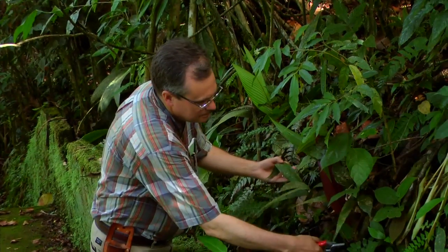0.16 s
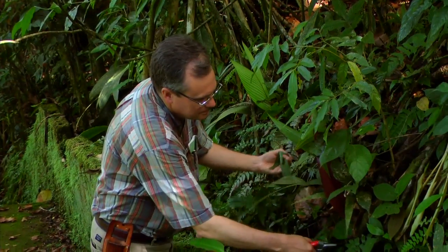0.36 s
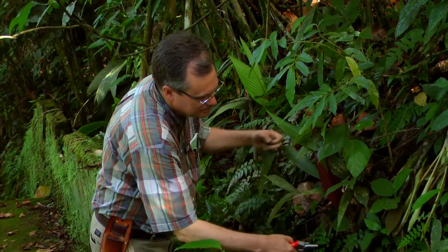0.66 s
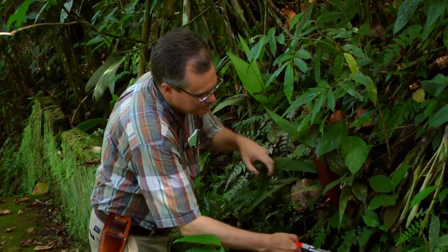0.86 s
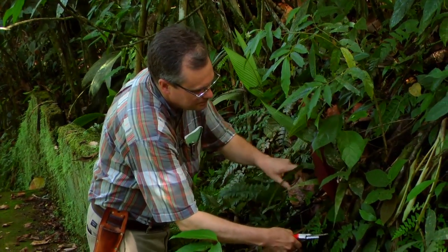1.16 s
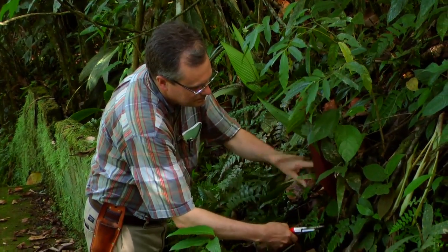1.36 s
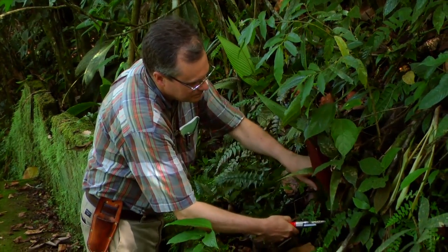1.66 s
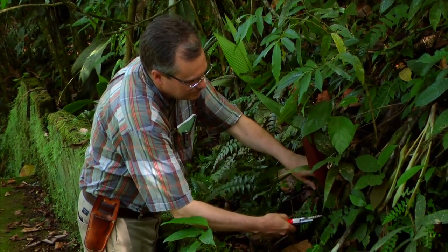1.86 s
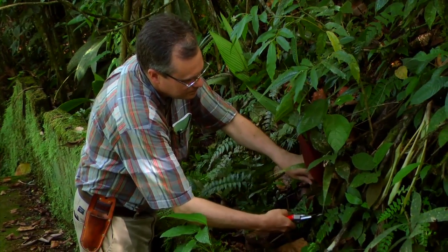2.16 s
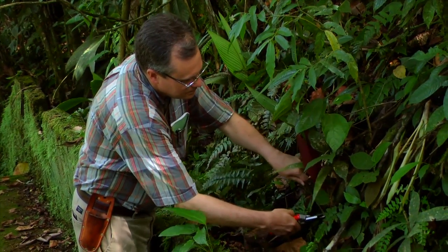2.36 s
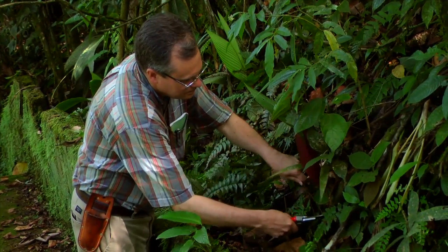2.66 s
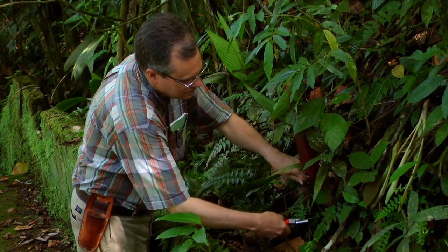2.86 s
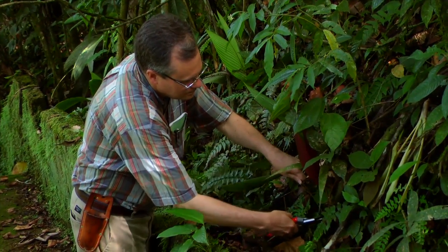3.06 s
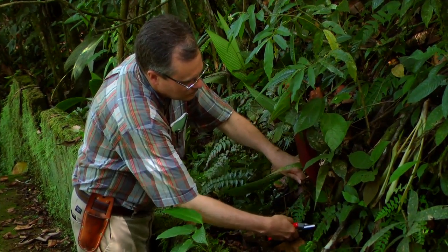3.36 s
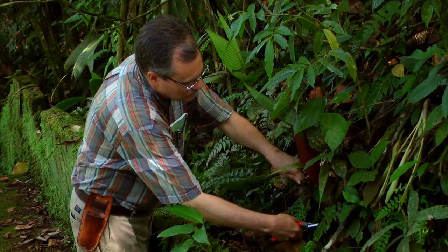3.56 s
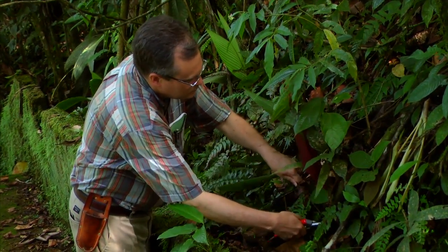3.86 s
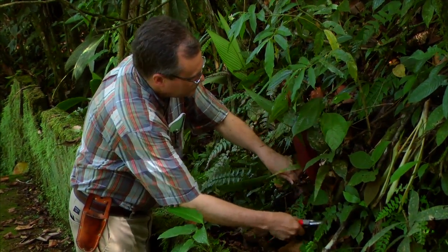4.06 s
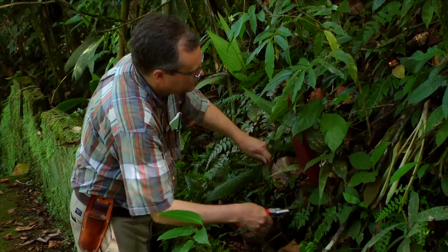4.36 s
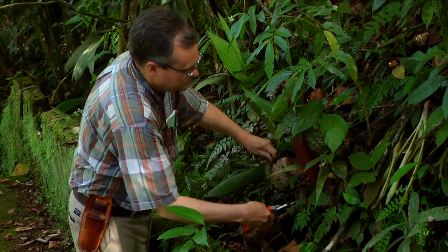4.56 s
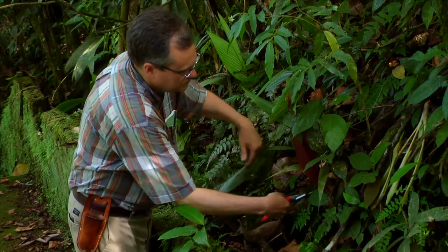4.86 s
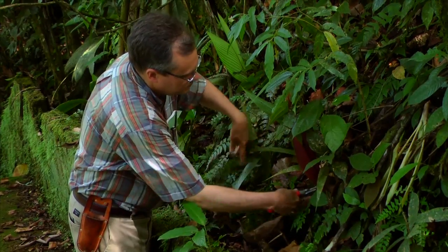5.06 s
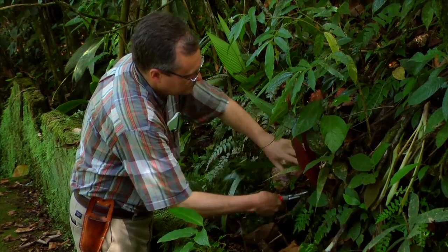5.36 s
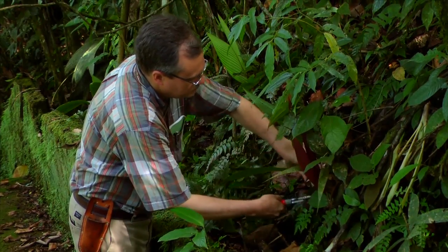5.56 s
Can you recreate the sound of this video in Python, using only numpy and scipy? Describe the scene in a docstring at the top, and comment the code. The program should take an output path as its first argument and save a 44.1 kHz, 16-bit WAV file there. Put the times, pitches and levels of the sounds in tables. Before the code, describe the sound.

Close by, leaves rustle and hand pruners snap a stem almost at once, then two more later, each a sharp crack with tiny fibre cracks. Between cuts, foliage brushes, flicks and lightly clicks. Behind, a continuous high insect shrill with pulsed trills, buzzing swells and thin falling bird notes, over soft air rumble. Open rainforest, close microphone, same sound in both channels.

```python
"""Insects shrill over moving air, rumble and a low hum (coloured noise, wavering sines) in a rainforest; leaves rustle.
Hand pruners soon cut the first of three stems: two fibres crack, the stem snaps, the blades close with a weaker knock.
Leaves rub in tiny ringing slips; flicks, knocks and cracks are coloured noise bursts; pruner clicks ring steel modes.
Behind, insects trill (pulsed noise) and buzz in swells that sink in pitch (lines and hiss); a bird calls in falling
sines."""
import sys
import numpy as np
from scipy import signal
from scipy.fft import rfft, irfft
from scipy.io import wavfile

SR = 44100
rng = np.random.default_rng(int(sys.argv[2]) if len(sys.argv) > 2 else 0)


def unload_wav(signal):
    """Save mono or channel-first audio to the path in sys.argv[1] as 16-bit WAV at rate SR, clipped to [-1, 1]."""
    wavfile.write(
        sys.argv[1],
        SR,
        np.round(np.clip(np.atleast_2d(signal).T, -1, 1) * 32767).astype(np.int16),
    )


N = 252252


def from_db(db):
    """Decibels to gain."""
    return np.exp(np.asarray(db) * (np.log(10) / 20))


def rms_one(x):
    """Scale to an rms of 1."""
    return x / np.sqrt(np.mean(x ** 2) + 1e-20)


def at_hz(points, hz):
    """Read a table on a log-frequency axis."""
    table_hz, values = np.array(points).T
    return np.interp(np.log(hz), np.log(table_hz), values)


def add(track, start_s, sound):
    """Mix a sound in at a time."""
    at = int(np.clip(round(start_s * SR), 0, N - 1))
    track[at:at + len(sound)] += sound[:N - at]


def drift(rate_hz, size=N):
    """Slow chance with a spread of 1: low-passed noise drawn every 40 samples."""
    pole = np.exp(-2 * np.pi * rate_hz * 40 / SR)
    white = rng.standard_normal(size // 40 + 2002)
    slow = signal.lfilter([1], [1, -2 * pole, pole ** 2], white)[2000:]  # skip the filter's start
    return np.interp(np.arange(size) / 40, np.arange(len(slow)), rms_one(slow))


def ring(clicks, hz, t60_s):
    """A resonance: a unit click sets a decaying sine of height 1 ringing."""
    pole, w = np.exp(-np.log(1000) / (t60_s * SR)), 2 * np.pi * hz / SR
    return signal.lfilter([0, np.sin(w)], [1, -2 * pole * np.cos(w), pole ** 2], clicks + 1e-18)


def hiss(spectrum):
    """Steady noise of a given colour, rms 1."""
    hz = np.maximum(np.fft.rfftfreq(N, 1 / SR), 1)
    return rms_one(irfft(rfft(rng.standard_normal(N)) * from_db(at_hz(spectrum, hz)), N))


def coloured(x, db_at):
    """Causal (minimum-phase) filter with a given response in dB, built by folding the cepstrum."""
    size = 2 * len(x)
    hz = np.maximum(np.fft.rfftfreq(size, 1 / SR), 1)
    cepstrum = irfft(np.log(from_db(db_at(hz))))
    cepstrum[1:len(x)] *= 2
    cepstrum[len(x) + 1:] = 0
    return irfft(rfft(x, size) * np.exp(rfft(cepstrum)))[:len(x)]


BAND_EDGES_HZ = 100 * 2 ** np.arange(0, 8, .5)


def shower(t60_at, size):
    """White noise of unit energy that dies away at its own pace in each half-octave band."""
    t, out = np.arange(size) / SR, 0
    hz, white = np.fft.rfftfreq(size, 1 / SR), rfft(rng.standard_normal(size))
    for low, high in zip(BAND_EDGES_HZ, BAND_EDGES_HZ[1:]):
        band = irfft(white * (hz >= low) * (hz < high), size)
        dying = band * np.exp(-np.log(1000) * t / t60_at(np.sqrt(low * high)))
        out = out + rms_one(dying) * np.sqrt(high - low)
    return out / np.linalg.norm(out)


def energy_over_10_ms(x, db):
    """Scale a burst to the energy of 10 ms at a given rms level."""
    return from_db(db) * x / np.linalg.norm(x) * np.sqrt(SR / 100)


def cracks(rows, colour, focus_db, ring_db, splinter_db, low_linger, lag_s=0.000982):
    """Each crack is one sharp release and a dying shower of tiny ones; the size of the part sets its ringing pitch."""
    out, grid_hz = np.zeros(N), np.fft.rfftfreq(4096, 1 / SR)
    # bending waves: lows arrive late, by lag_s at 4 kHz
    release = irfft(np.exp(-4j * np.pi * lag_s * np.sqrt(4000 * grid_hz)))
    for start_s, db, centre_hz, t60_s in rows:
        def splinter_t60(hz):
            return t60_s * (centre_hz / hz) ** low_linger

        def response_db(hz):
            octaves = np.log2(hz / centre_hz)
            peak_db = ring_db / (1 + (octaves / 0.21) ** 2)
            return at_hz(colour, hz) - focus_db * np.hypot(octaves, .5) + peak_db

        force = release + from_db(splinter_db) * shower(splinter_t60, size=len(release))
        add(out, start_s, energy_over_10_ms(coloured(force, response_db), db))
    return out


# Shrill insect chorus. Each row: frequency in Hz, relative level in dB per Hz.
CHORUS_SPECTRUM = [(6000, -34.5), (6800, -10), (7500, -0.5), (8400, 1.5), (9500, 3.5), (10200, 3),
                   (11000, -3.5), (12200, -11.5), (14000, -20), (16000, -17)]
# Moving air and low rumble. Each row: frequency in Hz, relative level in dB per Hz.
AIR_SPECTRUM = [(14, 2.5), (22, 2.5), (35, -9), (50, -27.5), (80, -21), (115, -20.5), (160, -21),
                (260, -25.5), (500, -29), (1000, -34), (2400, -35), (3400, -37.5), (5200, -37), (7000, -42),
                (16000, -58)]
# Hum lines. Each row: frequency in Hz, level in dB at the mean background level.
HUM_LINES = [(118.5, -62), (235, -67.5)]


def background(forest_db):
    """Insect chorus and moving air are coloured noise, the hum wavering sines; all follow one level."""
    chorus = from_db(forest_db - 1.2 + 0.18 * drift(35)) * hiss(CHORUS_SPECTRUM)
    air = from_db(forest_db + 4.0) * hiss(AIR_SPECTRUM)
    hum = 0
    for hz, db in HUM_LINES:
        level = from_db(db + 2.0 * drift(1.07))
        phase = 2 * np.pi * np.cumsum(hz * (1 + 0.0206 * drift(4.12))) / SR
        hum = hum + level * np.sqrt(2) * np.sin(phase)
    return chorus + air + hum * from_db(forest_db - forest_db.mean())


# Bush cricket's bouts. Each row: start in seconds, end in seconds, level at the stroke peaks in dB.
TRILL_BOUTS = [(.55, 1.45, -64), (1.8, 2.95, -63), (3.33, 4.25, -60), (4.854, 5.72, -56)]
# Trill colour. Each row: frequency in Hz, relative level in dB per Hz.
TRILL_SPECTRUM = [(11000, -44), (13200, -14), (14500, 6), (15500, 4), (16000, -2), (17000, -40)]


def trill(strokes_per_s=29.8, fade_s=.04):
    """Each wing stroke draws the scraper over the file: a short, very high rasp."""
    t, bouts = np.arange(N) / SR, 0
    for start_s, end_s, db in TRILL_BOUTS:
        bouts = bouts + from_db(db) * np.clip(np.minimum(t - start_s, end_s - t) / fade_s, 0, 1)
    strokes = np.sin(np.pi * strokes_per_s * t) ** 8
    return bouts * strokes * hiss(TRILL_SPECTRUM)


# Far buzzing swells. Each row: start in seconds, hold in seconds, final pulses per second,
# level in dB before the line, whine and hiss gains.
BUZZ_SWELLS = [(.52, .65, 244, -58), (2.15, .35, 253.5, -59), (2.45, .25, 257, -60.5),
               (4.15, .45, 244, -55.5)]
# Buzz colour. Each row: frequency in Hz, relative level in dB (per Hz for the hiss).
BUZZ_SPECTRUM = [(2300, -26), (3100, 1), (3450, 1.5), (3900, -1), (4600, 3), (5500, -1.5), (6300, -3),
                 (7200, -19)]
SWELL_ATTACK_S, SWELL_FADE_DB_PER_S = 0.35, 18
START_EXCESS, SETTLE_S = .07, .42  # share by which each starts too fast, and its settling time
LINES_GAIN_DB, WHINE_GAIN_DB, BUZZ_HISS_GAIN_DB = -1.5, -9.5, 1.5


def buzz():
    """Far insects' clicking drums swell and slow, two of them overlapping in the middle.

    Each is a stack of sinking lines, one a whine, partly blurred to hiss by the forest."""
    tones, power, age_s = np.zeros(N), np.zeros(N), np.arange(2 * SR) / SR
    haste, n = np.exp(-age_s / SETTLE_S), len(age_s)
    for start_s, hold_s, rate, db in BUZZ_SWELLS:
        fade_db = SWELL_FADE_DB_PER_S * np.maximum(age_s - SWELL_ATTACK_S - hold_s, 0)
        swell = np.sqrt(np.minimum(age_s / SWELL_ATTACK_S, 1)) * from_db(db - fade_db)
        pulse_rate = rate * (1 + START_EXCESS * haste + .002 * drift(20, size=n))
        phase = 2 * np.pi * np.cumsum(pulse_rate) / SR
        lines = 0
        for k in range(12, 25):
            line = drift(8, size=n) * np.cos(k * phase + rng.uniform(0, 2 * np.pi))
            lines = lines + line * from_db(at_hz(BUZZ_SPECTRUM, k * rate))
        whine_shape = 5 * np.sqrt(haste) * (1 - haste)
        whine = whine_shape * from_db(4 * drift(14, size=n)) * np.sin(13 * phase)
        add(tones, start_s, swell * (from_db(LINES_GAIN_DB) * rms_one(lines) + from_db(WHINE_GAIN_DB) * whine))
        add(power, start_s, swell ** 2)
    return tones + from_db(BUZZ_HISS_GAIN_DB) * np.sqrt(power) * hiss(BUZZ_SPECTRUM)


def trees(x, t60_s=0.24):
    """Trunks return a long, diffuse echo of a far caller: decaying noise as impulse response."""
    t = np.arange(SR // 2) / SR
    tail = rng.standard_normal(len(t)) * np.exp(-np.log(1000) * t / t60_s)
    return signal.fftconvolve(x, tail / np.linalg.norm(tail))[:N]


def falling_note(length_s, hz, db, fall=.022, waver=.006):
    """A near sine that swells, sinks a little in pitch and fades."""
    u = np.linspace(0, 1, int(length_s * SR))
    pitch_hz = hz * (1 - fall * u + waver * drift(80, size=len(u)))
    swell = np.sqrt(2 * np.abs(np.sin(np.pi * u)))
    return from_db(db) * swell * np.sin(2 * np.pi * np.cumsum(pitch_hz) / SR)


# Bird calls. Each row: start in seconds, starting pitch in Hz, direct level at mid-note in dB.
CALLS = [(2.408, 6930, -49), (3.519, 6960, -44), (4.476, 6940, -44), (5.400, 6940, -44)]
NOTE_LENGTHS_S, NOTE_SPACING_S = (0.014, 0.063), 0.037


def bird():
    """Every call is a pair of thin falling notes, short then longer, echoed by the trees."""
    song = np.zeros(N)
    for start_s, hz, db in CALLS:
        for k, length_s in enumerate(NOTE_LENGTHS_S):
            add(song, start_s + k * NOTE_SPACING_S, falling_note(length_s, hz, db))
    return song + from_db(1) * trees(song)


# Hand stirring the foliage. Each row: time in seconds, middle-band level in dB, still forest included.
STIR_LEVEL = [(0.0, -63.5), (0.11, -62), (0.46, -55.5), (0.94, -56), (1.02, -58), (1.78, -58.5), (2.1, -65),
              (2.36, -62.5), (2.69, -60), (3.01, -61.5), (3.78, -60), (4.16, -50.5), (4.33, -53),
              (4.52, -56.5), (4.75, -57), (5.03, -54.5), (5.24, -49.5), (5.72, -51)]
STIR_GAIN_DB = 0.3
STILL_BAND_DB = -13.5  # the still forest's share of that band, relative to the background level


def stirring(forest_db):
    """The rustle is what the middle band holds above the still forest."""
    time_s, level_db = np.transpose(STIR_LEVEL)
    band_db = np.interp(np.arange(N) / SR, time_s, level_db)
    still_share = from_db(forest_db + STILL_BAND_DB - band_db) ** 2
    return STIR_GAIN_DB + band_db + 10 * np.log10(np.maximum(1 - still_share, .04))


# Leaves brushing past hand and sleeve. Each row: middle in seconds, length in seconds,
# rubbing level in dB before the grain and hiss gains, crisp edge level in dB.
LEAF_BRUSHES = [(0.112, 0.046, -55, -76), (0.293, 0.07, -56, -64), (0.675, 0.21, -52.5, -52),
                (0.992, 0.051, -46, -47), (1.127, 0.02, -48, -71), (1.266, .03, -52, -76),
                (1.385, 0.1, -49, -68), (1.714, 0.061, -51.5, -56), (1.822, 0.04, -53, -70),
                (1.918, 0.033, -44.5, -64), (2.473, 0.026, -54, -74), (3.729, 0.034, -49, -69),
                (3.888, 0.052, -52.5, -66), (4.035, 0.092, -47, -60), (4.388, 0.12, -47, -44),
                (4.44, 0.04, -47.5, -43.5), (5.13, 0.18, -48, -47.5), (5.209, 0.028, -46.5, -58)]
# Rubbing leaves. Each row: frequency in Hz, relative level in dB per Hz.
LEAF_SPECTRUM = [(200, -15), (500, -9.5), (1200, -7), (2500, -3), (4000, -6.5), (6500, -9), (10000, -24.5),
                 (16000, -37)]
# Crisp leaf edges. Each row: frequency in Hz, relative level in dB per Hz.
EDGE_SPECTRUM = [(3000, -17), (6000, -1), (13000, -5), (16000, -14)]


def rustle(stir_db, slips_per_s=1400, clump_db=5.5):
    """Leaves rub in clumps of tiny slips, each ringing for a few cycles; the colour shifts from leaf to leaf."""
    power, edge_power, t = from_db(stir_db) ** 2, 0, np.arange(N) / SR
    for middle_s, length_s, db, edge_db in LEAF_BRUSHES:
        swell = np.exp(-(2 * (t - middle_s) / length_s) ** 2)
        power = power + from_db(db) ** 2 * swell
        edge_power = edge_power + from_db(edge_db) ** 2 * swell
    slip_chance = slips_per_s * from_db(clump_db * drift(70)) / SR
    slips = rng.choice([-1, 1], N) * (rng.random(N) < slip_chance)
    pitches_hz = np.geomspace(250, 14000, 24)
    dealt = rng.integers(0, len(pitches_hz), N)  # each slip gets one pitch
    grains = 0
    for k, hz in enumerate(pitches_hz):
        struck = slips * (dealt == k) * from_db(1.4 * drift(24.0))
        grains = grains + from_db(at_hz(LEAF_SPECTRUM, hz)) * np.sqrt(hz) * rms_one(ring(struck, hz, 14.6 / hz))
    rubbing = from_db(1.5) * rms_one(grains) + from_db(-5) * hiss(LEAF_SPECTRUM)
    edges = rms_one(hiss(EDGE_SPECTRUM) * from_db(5 * drift(200)))
    return np.sqrt(power) * rubbing + np.sqrt(edge_power) * edges


# Leaves and stalks flicking and knocking. Each row: start in seconds, energy as dB over 10 ms,
# ringing pitch in Hz, t60 in seconds.
SINGLE_FLICKS = [(.3685, -38.5, 1570, 0.059), (.412, -42.5, 1930, 0.015), (.444, -46, 2010, .015),
                 (.7114, -44.5, 4200, 0.014), (.8985, -46.5, 2000, 0.017), (.9563, -40, 2660, 0.066),
                 (1.045, -39.5, 3050, 0.37), (3.3529, -44, 2620, 0.091), (4.3077, -39.5, 1500, 0.018),
                 (4.4624, -38, 2350, .021), (4.856, -45.5, 2350, 0.033), (5.0795, -38, 3630, 0.017),
                 (5.2251, -36.5, 2780, 0.022), (5.5027, -28.5, 1080, 0.0055), (5.5035, -37, 470, 0.011),
                 (5.5122, -40.5, 4000, 0.1), (5.6142, -45.5, 2260, 0.035)]
# Flick colour. Each row: frequency in Hz, gain in dB.
FLICK_RESPONSE = [(60, -30), (300, 8.5), (1000, 4), (3000, -1.5), (6000, -2.5), (8000, -13), (16000, -30)]
RECOIL_DELAY_S, RECOIL_HZ, RECOIL_T60_S = .012, 1830, 0.056  # the freed stem springs away after the snap
SMALL_PER_S, SMALL_HZ, SMALL_T60_S = 6.5, 2040, 0.043
SMALL_OVER_STIR_DB = 5


def flicks(stir_db, spread_db=1.5, spread_octaves=0.25):
    """Leaves and stalks spring back: after each cut, in single knocks, and by chance, more and louder when stirred."""
    recoils = [(snap_s + RECOIL_DELAY_S, db, RECOIL_HZ, RECOIL_T60_S) for snap_s, *_, db in STEM_CUTS]
    effort = np.cumsum(from_db(stir_db))
    count = int(SMALL_PER_S * N / SR)
    shares = (np.arange(count) + rng.random(count)) / count
    small = []
    for at in np.searchsorted(effort, effort[-1] * shares):
        level_chance, pitch_chance = rng.standard_normal(2)
        db = stir_db[at] + SMALL_OVER_STIR_DB + spread_db * level_chance
        small.append((at / SR, db, SMALL_HZ * 2 ** (spread_octaves * pitch_chance), SMALL_T60_S))
    return cracks(SINGLE_FLICKS + recoils + small, FLICK_RESPONSE,
                  focus_db=7.0, ring_db=6.0, splinter_db=8.0, low_linger=0.088)


# Light pruner clicks. Each row: start in seconds, energy as dB over 10 ms, t60 in seconds,
# loss of modes away from the main one in dB per octave.
PRUNER_CLICKS = [(.7897, -40, 0.006, -5), (3.2371, -41, 0.0074, 0), (3.6043, -40.5, 0.016, 21)]
# Steel modes. Each row: frequency in Hz, relative level in dB.
STEEL_MODES = [(2400, -29.5), (2900, 7), (3660, -4), (4375, 16.5), (4980, 9), (5680, 3), (6250, 8),
               (8200, 12)]
MAIN_MODE_HZ = 4550


def clicks(spread_db=-5.0, scrape_db=5, scrape_t60_s=0.014):
    """The steel is tapped and scrapes briefly; each tap weights its modes differently."""
    out = np.zeros(N)
    for start_s, db, t60_s, loss_db in PRUNER_CLICKS:
        scrape = shower(lambda hz: scrape_t60_s, size=4096)
        force = signal.unit_impulse(4096) + from_db(scrape_db) * scrape
        ping = 0
        for hz, mode_db in STEEL_MODES:
            weight_db = mode_db - loss_db * abs(np.log2(hz / MAIN_MODE_HZ)) + spread_db * rng.standard_normal()
            ping = ping + from_db(weight_db) * ring(force, hz, t60_s)
        add(out, start_s, energy_over_10_ms(ping, db))
    return out


# Stems cut. Each row: snap in seconds, energy as dB over 10 ms, ringing pitch in Hz, splintering t60 in seconds,
# fibre spacing in seconds, fibre level in dB, fibre pitch in Hz, closing delay in seconds, closing level in dB,
# closing pitch in Hz, recoil level in dB. All but the recoil are then scaled by CUT_GAIN_DB.
STEM_CUTS = [(0.3359, -20.5, 1930, 0.0046, .0093, -31, 2900, 0.00061, -23, 2030, -35),
             (2.6877, -21, 3140, 0.023, 0.014, -34, 3520, 0.013, -48, 1400, -42),
             (4.0872, -23, 6250, 0.025, .0085, -30.5, 6100, 0.00034, -27, 850, -34.5)]
# Stem breaking in the blades. Each row: frequency in Hz, gain in dB.
CUT_RESPONSE = [(60, -6), (150, -2.5), (300, -5), (700, -5), (1300, 0), (2000, -3), (3000, -1), (3900, -4),
                (5500, 0.5), (7500, -8.5), (10000, -8), (12000, -12), (13300, -14), (16000, -19)]
CUT_GAIN_DB = -0.9
BITE_LEAD_S, BITE_DB, BITE_HZ, BITE_T60_S = 0.047, -41, 3700, 0.15  # level before CUT_GAIN_DB
FIBRE_STEP_DB, FIBRE_T60_S = 5.5, .017  # the earlier fibre is a step weaker
CLOSING_T60_S = 0.0073


def pruners():
    """The blade scrapes into the stem, two fibres crack in turn, the stem snaps and the blades close."""
    rows = []
    for snap_s, db, hz, t60_s, spacing_s, fibre_db, fibre_hz, delay_s, closing_db, closing_hz, _ in STEM_CUTS:
        rows.append((snap_s - BITE_LEAD_S, BITE_DB, BITE_HZ, BITE_T60_S))
        for k in range(2):
            rows.append((snap_s - (k + 1) * spacing_s, fibre_db - k * FIBRE_STEP_DB, fibre_hz, FIBRE_T60_S))
        rows.append((snap_s, db, hz, t60_s))
        rows.append((snap_s + delay_s, closing_db, closing_hz, CLOSING_T60_S))
    return from_db(CUT_GAIN_DB) * cracks(rows, CUT_RESPONSE,
                                         focus_db=3.0, ring_db=3.5, splinter_db=6.0, low_linger=0.33)


# Sound scattered back. Each row: frequency in Hz, relative level in dB per Hz.
SCATTER_SPECTRUM = [(100, -20), (280, 0.5), (700, -9), (1500, -8.5), (3000, -2), (6000, -2.5),
                    (15000, -4.5)]
# Its decay. Each row: frequency in Hz, t60 in seconds.
SCATTER_DECAY = [(150, 0.3), (1500, 0.08), (5000, 0.03), (15000, 0.039)]


def undergrowth(x):
    """Leaves and ground scatter a short tail in which the lows last longest."""
    tail = shower(lambda hz: at_hz(SCATTER_DECAY, hz), size=8192)
    tail = coloured(tail, lambda hz: at_hz(SCATTER_SPECTRUM, hz))
    tail *= 1 - np.exp(-np.arange(len(tail)) / SR / 0.0011)  # soft onset
    return signal.fftconvolve(x, tail / np.linalg.norm(tail))[:N]


FOREST_DB, FOREST_RISE_DB, RISE_AT_S, RISE_S = -49, 4.0, 2.35, 0.33  # grows louder once and stays so


def scene():
    """Close work with the pruners in front of the forest; both channels alike."""
    forest_db = FOREST_DB + FOREST_RISE_DB * np.clip((np.arange(N) / SR - RISE_AT_S) / RISE_S, 0, 1)
    far = background(forest_db) + trill() + buzz() + bird()
    stir_db = stirring(forest_db)
    leaves = rustle(stir_db)
    near = flicks(stir_db) + clicks() + pruners()
    return np.tile(far + leaves + near + from_db(-6) * undergrowth(near), (2, 1))


def record(dry, cutoff_hz=15900):
    """The top is cut steeply by an elliptic low-pass."""
    return signal.sosfilt(signal.ellip(12, .1, 70, cutoff_hz, fs=SR, output="sos"), dry)


dry = scene()
out = record(dry)
unload_wav(out)
```